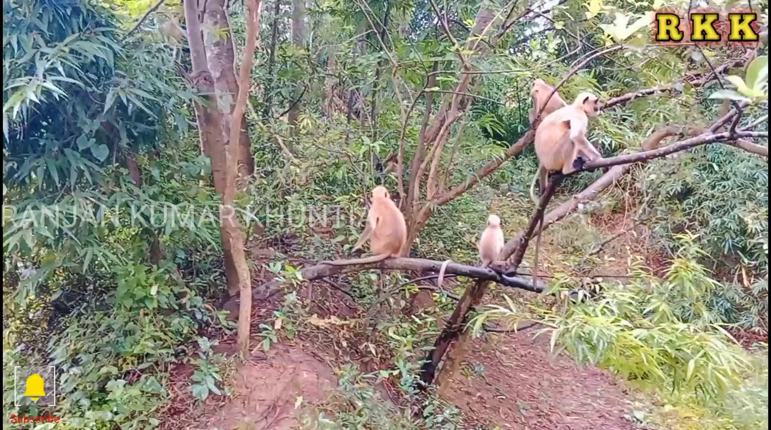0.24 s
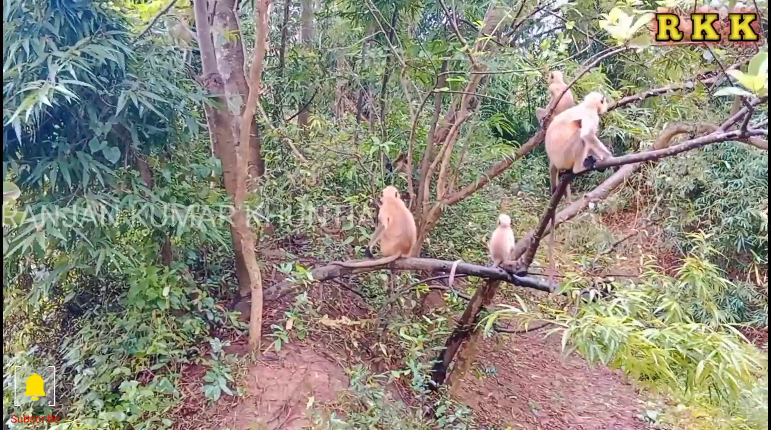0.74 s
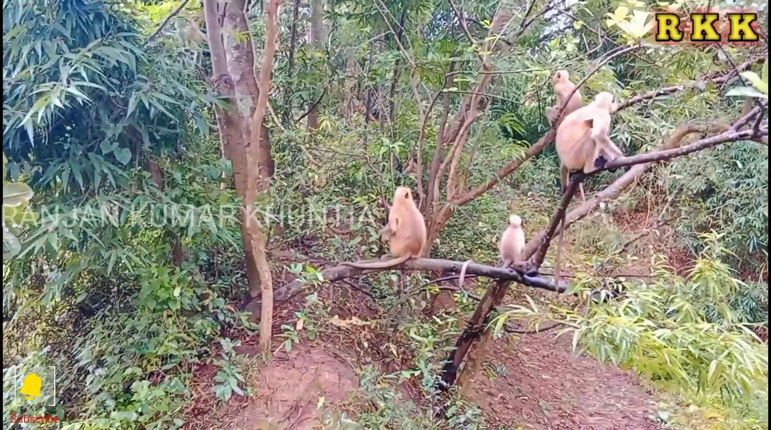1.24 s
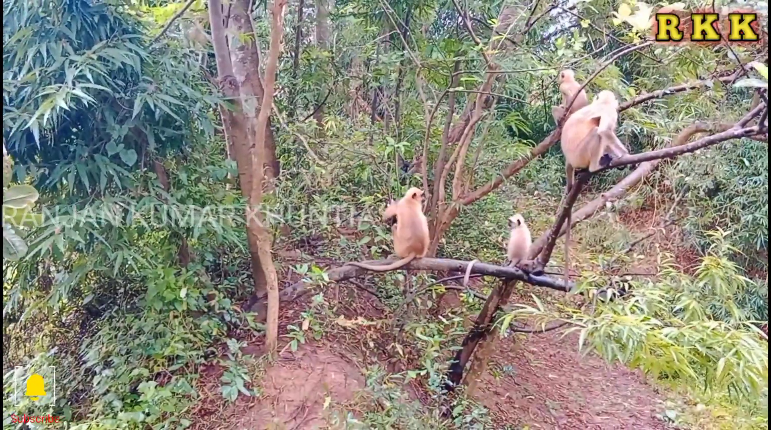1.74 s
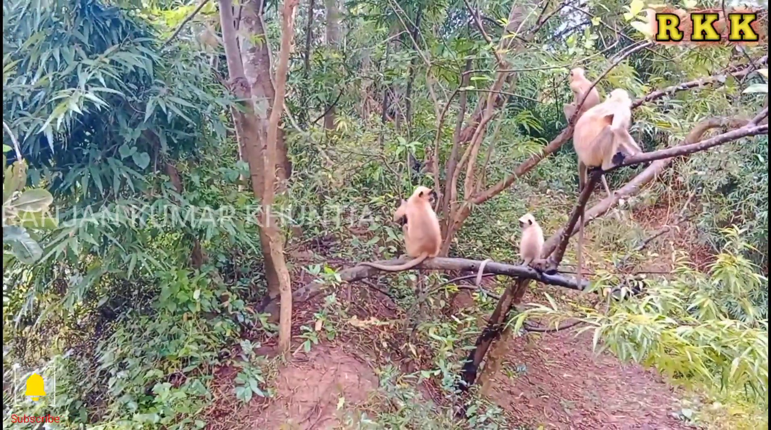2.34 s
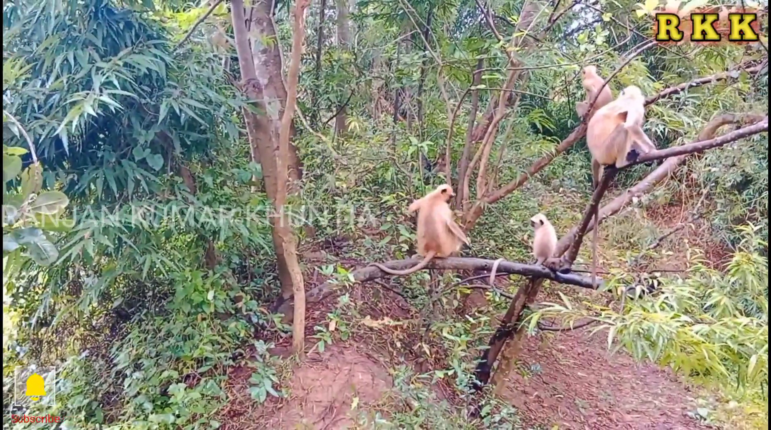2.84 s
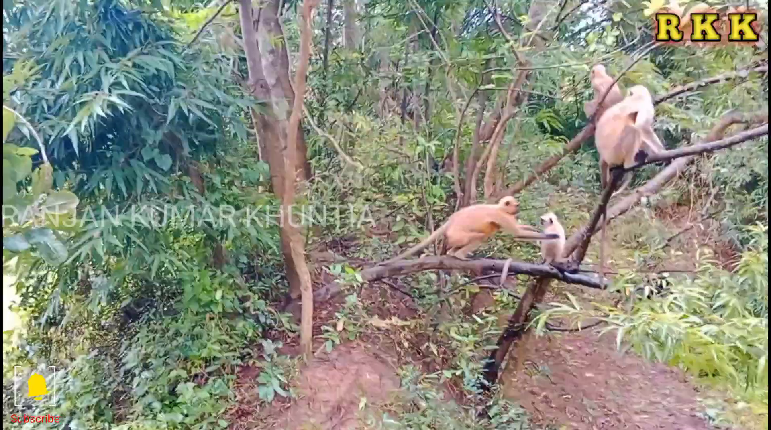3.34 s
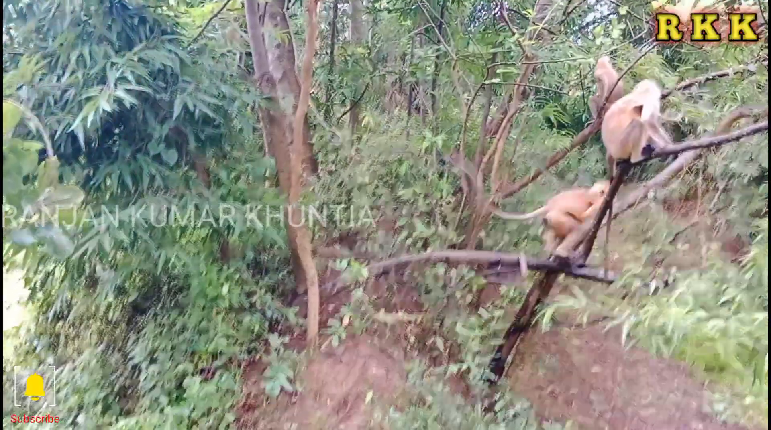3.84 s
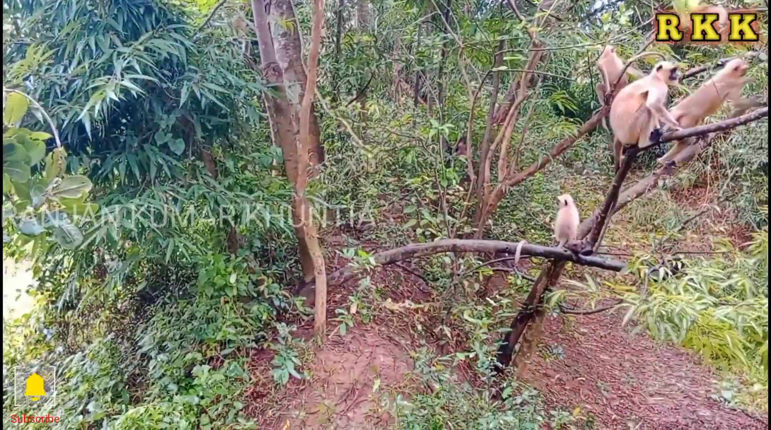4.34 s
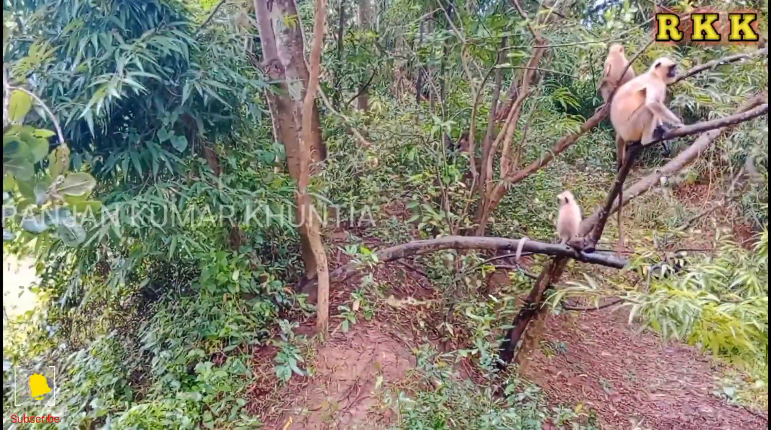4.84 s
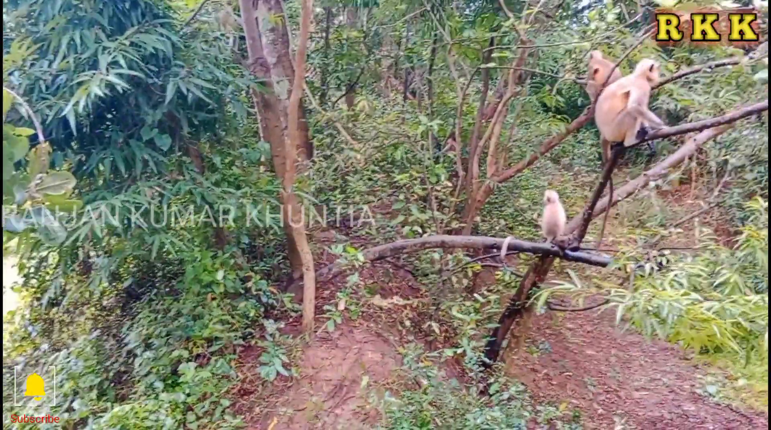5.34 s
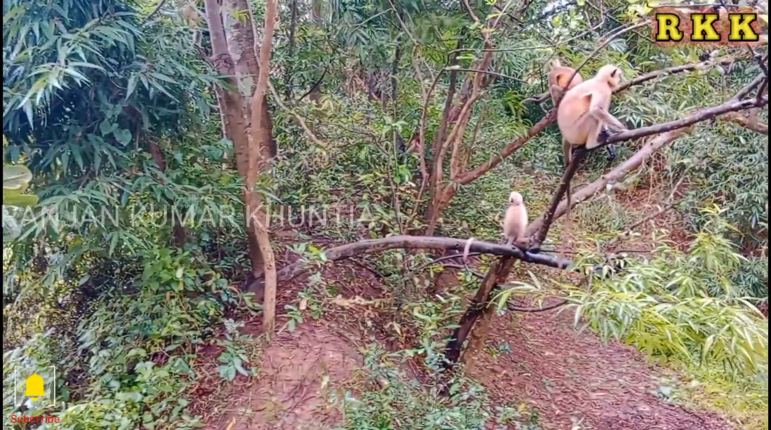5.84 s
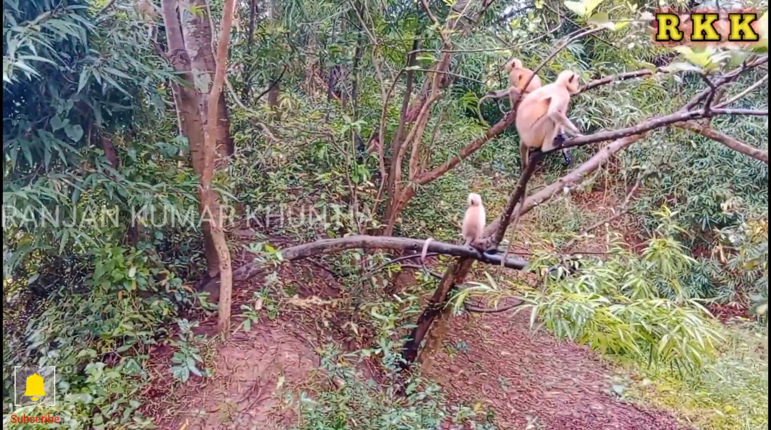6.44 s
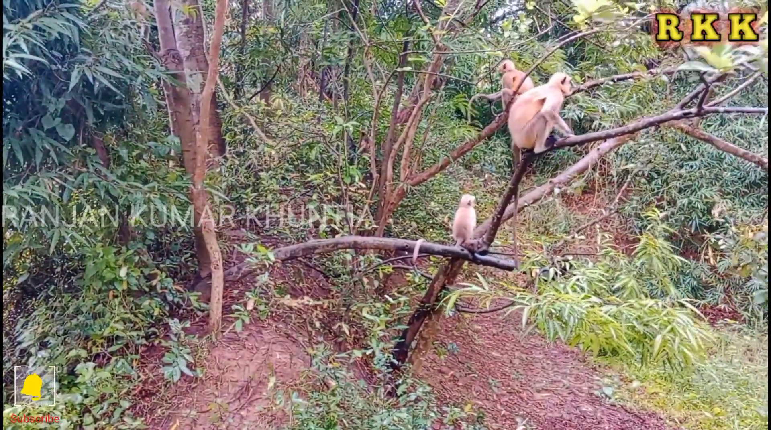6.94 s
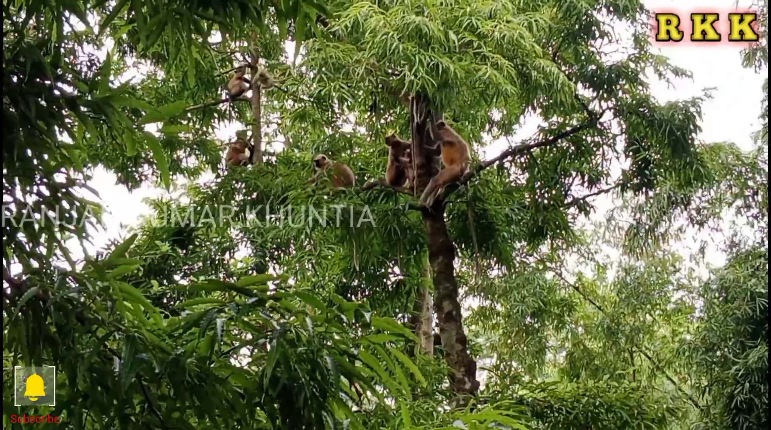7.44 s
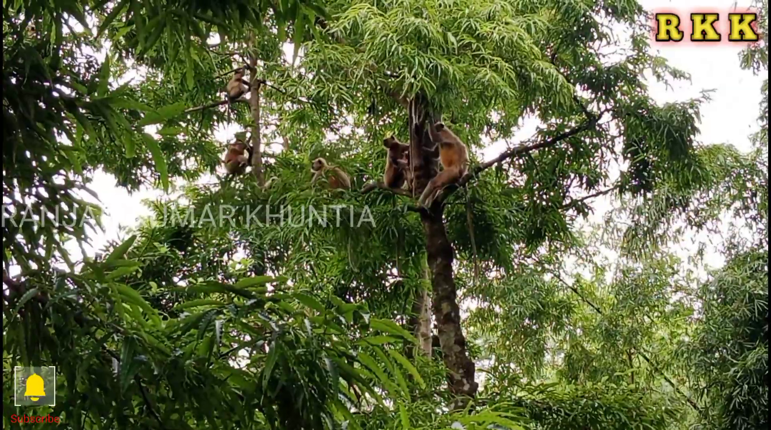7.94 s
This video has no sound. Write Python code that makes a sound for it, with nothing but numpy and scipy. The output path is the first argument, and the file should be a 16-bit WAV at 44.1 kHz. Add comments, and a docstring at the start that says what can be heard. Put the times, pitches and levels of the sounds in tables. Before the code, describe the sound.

Soft birdsong, dull branch thumps and a sharp leafy crash with snapping twigs, before an abrupt cut to a dense, piercing cicada buzz.

```python
"""A forest with monkeys, then a cut at 7 s to a second spot under loud cicadas.
Gliding sine notes, sent into tree echoes, voice the hooted trills, chips, whistles, slurs, pips and coos.
In the first spot a monkey bounds along a branch (pushes over a damped ring) and crashes into foliage
(coloured clicks), snapping twigs. Dense filtered clicks make the far insects and the cicadas, whose
tymbals add narrow ringing bands; soft noise makes the air and the bumps."""
import sys
import numpy as np
from scipy import signal
from scipy.fft import rfft, irfft
from scipy.io import wavfile
from scipy.ndimage import uniform_filter1d

SR = 44100
rng = np.random.default_rng(int(sys.argv[2]) if len(sys.argv) > 2 else 0)


def store_wav(level_fs):
    """Save 16-bit WAV to argv[1]."""
    pcm = np.round(np.clip(np.atleast_2d(level_fs), -1, 1) * 32767)
    wavfile.write(sys.argv[1], SR, pcm.T.astype(np.int16))


N = 360297
T = np.arange(N) / SR
FREQS = np.maximum(np.fft.rfftfreq(N, 1 / SR), 1)
JUMP_S = 7.017  # cut from the first place to the second
WAVER_HZ, WAVER = 21.9, 0.021  # pitch waver: rate, full depth as a share of the pitch


def undb(db):
    """Decibels to gain."""
    return 10 ** (np.asarray(db) / 20)


def unit(x):
    """Scale to rms 1."""
    return x / np.sqrt(np.mean(x ** 2))


def add(out, s, x):
    """Mix x into out from time s."""
    i = max(int(s * SR), 0)
    out[i:i + len(x)] += x[:max(N - i, 0)]


def colour(x, points):
    """Give x a spectral tilt drawn through (f/Hz, level/dB) points, at rms 1."""
    hz, db = np.transpose(points)
    gain = undb(np.interp(np.log(FREQS), np.log(hz), db))
    return unit(irfft(rfft(x) * gain, N))


def butter(x, hz, kind, order=2):
    """Causal low-, high- or band-pass."""
    return signal.sosfilt(signal.butter(order, hz, kind, fs=SR, output="sos"), x)


def walk(rate):
    """Smooth random wander at rms 1, with rate new targets a second."""
    k = int(SR / rate)
    steps = np.repeat(rng.standard_normal(N // k + 1), k)
    return unit(uniform_filter1d(uniform_filter1d(steps, k), k)[:N])


def clicks(rate, spread_db):
    """Random clicks of either sign and unequal size, about rate a second."""
    hits = rng.random(N) < rate / SR
    return hits * rng.choice([-1, 1], N) * undb(spread_db * rng.standard_normal(N))


def swell(s, hold_s, rise_db_s, fall_db_s):
    """Gain that climbs to 1 at time s, holds and dies away."""
    return undb(-rise_db_s * np.maximum(s - T, 0) - fall_db_s * np.maximum(T - s - hold_s, 0))


def whistle(length, start_hz, middle_hz, end_hz, edge=0.22, waver=0):
    """A pure note gliding through three pitches; edge is the share that swells and fades."""
    u = np.linspace(0, 1, int(max(length, .01) * SR))
    hz = np.polyval(np.polyfit([0, .5, 1], [start_hz, middle_hz, end_hz], 2), u)
    hz = hz * (1 + waver * np.sin(2 * np.pi * (WAVER_HZ * T[:len(u)] + rng.random())))
    tone = np.sqrt(2) * np.sin(2 * np.pi * np.cumsum(hz) / SR)
    return tone * signal.windows.tukey(len(u), min(edge, 1))


def flutter(note, hz, depth):
    """Make a note's loudness tremble at about hz."""
    pace, phase = rng.random(2)
    rate_hz = hz * (.8 + .4 * pace)
    return note * (1 + depth * np.sin(2 * np.pi * (rate_hz * T[:len(note)] + phase)))


def forest(x, near_db, near_t60, far_db, far_t60):
    """Near trunks return separate echoes; deeper woods add a thin, long tail."""
    t = T[:SR]
    trunks = clicks(1100, 3)[:SR] * undb(-60 * t / near_t60) * (t > .004)
    depth = rng.standard_normal(SR) * undb(-60 * t / far_t60) * (1 - np.exp(-t / 0.041))
    echoes = undb(near_db) * unit(trunks) + undb(far_db) * unit(depth)
    return x + signal.fftconvolve(x, echoes / np.sqrt(SR))[:N]


def screened(db):
    """Share of a call's direct sound that leaves block: the fainter the call, the more is echo alone."""
    return np.clip((-54 - db) / 20, 0, .8)


# hooted trills: t/s, level/dB, lead-in note level/dB relative to the trill
TRILLS = [(0.119, -56, -33), (1.026, -56.5, -6.5), (1.897, -54.5, -6.5), (2.783, -53, -7),
          (4.775, -44.5, -15), (5.642, -54.5, -4), (6.542, -55, -7.5), (7.32, -52.5, -18)]
HOOT_GAP_S, HOOT_HZ = .0345, (1030, 966, 895)  # spacing; start, middle and end pitch


def hooting_bird():
    """A low lead-in note, four quick falling hoots and a longer last one."""
    out = np.zeros(N)
    for s, db, lead_db in TRILLS:
        add(out, s - .15, undb(db + lead_db) * whistle(.044, 880, 835, 790, edge=.7))
        for k in np.arange(4):
            pitch = 1 + 0.0042 * rng.standard_normal()
            hoot = whistle(.031, *np.array(HOOT_HZ) * pitch, edge=.8)
            add(out, s + HOOT_GAP_S * k - .001, undb(db - .8) * hoot)
        last = whistle(.075, 985, 955, 925, edge=.4)
        add(out, s + .134, last * undb(db + np.linspace(3, -7, len(last))))
    return forest(out, near_db=-8, near_t60=.38, far_db=-19, far_t60=.75)


# bursts of high chips: t/s, number of chips, top pitch f/Hz, level/dB
CHIPS = [(.111, 3, 7350, -57), (0.332, 2, 6260, -66.5), (.498, 2, 7220, -59), (1.071, 3, 7280, -57.5),
         (1.56, 3, 7200, -57.5), (1.89, 3, 6480, -65.5), (1.995, 2, 7240, -55.5), (2.222, 2, 6470, -63.5),
         (2.63, 3, 7300, -56.5), (3.048, 2, 6830, -62), (3.224, 3, 6370, -56), (3.486, 3, 7040, -59.5),
         (4.146, 3, 7100, -56), (4.412, 2, 6160, -60.5), (4.454, 3, 7260, -55.5), (5.13, 3, 7190, -52.5),
         (5.482, 2, 7100, -54), (5.577, 3, 6280, -62), (6.022, 3, 7350, -55.5), (6.341, 3, 6210, -59.5),
         (6.454, 3, 7300, -56.5), (7.335, 3, 5880, -63.5), (8.104, 3, 6670, -52)]
FAR_CHIP_HZ, FAR_CHIP_DB = 6550, -73  # a neighbour's pairs, at random moments in the first place


def chipping_bird(count=12):
    """Each chip drops steeply from its top pitch and flattens out; a weak octave rides on it."""
    out, blocked = np.zeros((2, N))
    slot_s = JUMP_S / count
    neighbour = [((k + when) * slot_s, 2, FAR_CHIP_HZ, FAR_CHIP_DB)
                 for k, when in enumerate(rng.random(count))]
    for s, chips, top_hz, db in CHIPS + neighbour:
        for k in np.arange(round(chips)):
            size_db, bend, stretch = rng.standard_normal(3)
            start, end = top_hz * (1 - 0.006 * k), 5300 * (1 + 0.017 * bend)
            pitches = np.array([start, end + 0.38 * (start - end), end])
            length = 0.016 * (1 + 0.13 * stretch)
            chip = whistle(length, *pitches, edge=0.5)
            chip = chip + undb(-25.0) * whistle(length, *2 * pitches, edge=0.22)
            # the note weakens as it falls
            chip = chip * undb(db + 0.77 * size_db + np.linspace(1, -4.5, len(chip)))
            add(out, s + .0275 * k, chip)
            add(blocked, s + .0275 * k, screened(db) * chip)
    return forest(out, near_db=-1.5, near_t60=.16, far_db=-13, far_t60=.8) - blocked


# feet landing on the branch: t/s, level/dB
LANDINGS = [(0.933, -67), (2.959, -33), (3.104, -58.5), (3.192, -50), (3.227, -32), (3.247, -34.5),
            (3.504, -52), (3.579, -30), (3.682, -66), (3.826, -30), (4.128, -46), (4.25, -57)]
# damped ring of the branch: f/Hz, t60/s, level/dB
BRANCH_MODES = [(74, 0.078, -42), (109.4, 0.069, -17.5), (190, 0.024, -12.5), (298, 0.0092, -7)]
# first touch, full weight and rebound within one landing: delay t/s, level/dB relative to the landing
CONTACTS = [(-.008, -16.5), (0, 0), (.019, -26)]
SOFT_HZ, HARD_HZ, HARD_DB = 264, 980, -29  # cutoff of the softest contact; what one at HARD_DB adds


def thumps():
    """Each contact gives a push and rebound, a short low ring, a scuff and a dying shudder; harder is brighter."""
    out, t = np.zeros(N), T[:SR // 3]
    ring = sum(undb(db) * np.sin(2 * np.pi * hz * t) * undb(-60 * t / t60)
               for hz, t60, db in BRANCH_MODES)
    contacts = [(s + delay, db + part_db) for s, db in LANDINGS for delay, part_db in CONTACTS]
    for s, db in contacts:
        bright_hz = SOFT_HZ + HARD_HZ * undb(db - HARD_DB) ** 0.91
        scuff, shake = rng.standard_normal((2, len(t)))
        push = signal.unit_impulse(len(t)) + undb(-29.5) * scuff * undb(-60 * t / 0.071)
        push = butter(push, bright_hz, "low", order=3)
        push = butter(push, 2040, "low", order=4)
        push = butter(push, 49, "high", order=1)
        shudder = undb(-23.5) * unit(butter(shake, [60, 200], "band")) * undb(-60 * t / 0.15)
        add(out, s - .0005, undb(db) * (push / np.abs(push).max() + ring + shudder))
    return butter(out, 62, "high", order=3)


# spectrum of the slapping leaves: f/Hz, level/dB
LEAF_SPECTRUM = [(290, -49), (500, -11.5), (696, -22.5), (940, -11), (1130, -16), (1270, -2), (2100, -2),
                 (2680, -7.5), (3420, -6), (3790, -14.5), (4760, -24.5), (6920, -7), (8340, -12.5),
                 (9490, -27.5), (15500, -18)]
# spectrum of the settling rustle: f/Hz, level/dB
SETTLING_SPECTRUM = [(290, -38), (500, -30.5), (940, -11.5), (1740, -3), (2010, -2), (2610, -4.5),
                     (3370, -4.5), (4760, -27), (5500, -32), (6260, -5.5), (8460, -1.5), (9490, -12),
                     (15500, -13.5)]
# spectrum of the whooshing boughs: f/Hz, level/dB
BOUGH_SPECTRUM = [(18, -76.5), (30, -32), (199, 5), (328, 2.5), (357, 6), (436, 1.5), (697, 3.5), (862, 2),
                  (900, -2), (1170, -25.5), (1980, -120)]
# snapping twigs: t/s, peak level/dB
SNAPS = [(4.7497, -20.5), (4.7545, -15), (4.7576, -15), (4.7606, -17), (4.7648, -20.5), (4.7672, -18)]


def foliage():
    """Countless leaves slap, then settle to a thinner rustle; boughs whoosh and swing back, a few twigs snap."""
    crash = undb(-35.5) * swell(4.733, hold_s=0.12, rise_db_s=211.5, fall_db_s=128)
    settle = undb(-55.5) * swell(5.104, hold_s=0.032, rise_db_s=49, fall_db_s=28.5)
    plunge = undb(-50) * swell(4.761, hold_s=0.12, rise_db_s=143, fall_db_s=198)
    swing_back = undb(-70) * swell(5.2, hold_s=0.076, rise_db_s=216.5, fall_db_s=171)
    settled = np.clip((T - 4.88) / 0.31, 0, 1)  # crossfade from slaps to rustle
    slapping, dropping = clicks(4000, 3.5), clicks(2500, 4)
    slaps = np.sqrt(1 - settled) * colour(slapping, LEAF_SPECTRUM)
    slaps = slaps + np.sqrt(settled) * colour(dropping, SETTLING_SPECTRUM)
    slaps = butter(slaps, 120, "high") * undb(1.52 + 0.99 * walk(70))
    whoosh = butter(colour(clicks(2000, 2.7), BOUGH_SPECTRUM), 60, "high") * undb(0.5 * walk(50))
    out = np.hypot(crash, settle) * slaps + np.hypot(plunge, swing_back) * whoosh
    t = T[:SR // 50]
    for s, db in SNAPS:
        crack = np.sin(2 * np.pi * 2150 * t) * undb(-60 * t / 0.0041)
        crack = crack + 0.18 * rng.standard_normal(len(t)) * undb(-60 * t / 0.00068)
        crack = butter(crack, 920, "high")
        add(out, s, undb(db) * crack / np.abs(crack).max())
    return out


# spectrum of the cicada buzz: f/Hz, level/dB
CICADA_SPECTRUM = [(5000, -58), (5200, -43.5), (6050, -36.5), (6400, -18.5), (7100, -11.5), (7750, 0),
                   (8350, 1), (8800, -12), (9300, -19), (10000, -23), (11400, -39.5), (12700, -37),
                   (13900, -46), (15300, -34)]
# tymbal resonances: f/Hz, level/dB relative to one another
TYMBALS = [(6799, -70.5), (6928, -86), (7144, -63.5), (7246, -61), (7477, -59.5), (7693, -51), (7747, -50),
           (8070, -51.5), (8317, -50), (8646, -54.5), (8909, -60)]


def cicadas():
    """Overlapping tymbal clicks make a broad buzz; each insect also rings at its own sharp pitch."""
    buzz = colour(clicks(3500, 0.8), CICADA_SPECTRUM)
    rings, width_hz = 0, 11
    for hz, db in TYMBALS:
        resonance = 1 / (1 + ((FREQS - hz) / width_hz) ** 2)
        rings = rings + undb(db) * unit(irfft(rfft(clicks(900, 2.1)) * resonance, N))
    return (undb(-4.0) * buzz + undb(-5.0) * unit(rings)) * undb(-34.5 + .5 * walk(35))


# steep down-slurs: t/s, length/s, level/dB ahead of a 3 dB trim, low after-note level/dB relative to the slur
SLURS = [(7.118, 0.038, -59.5, -6), (7.244, 0.086, -59.5, -27), (7.414, 0.041, -53, -9.5),
         (7.707, 0.046, -52.5, -11), (7.994, 0.037, -52, -10)]
SLUR_HZ, AFTERNOTE_HZ = (4550, 3645, 2567), (2030, 2244, 2430)  # start, middle, end
AFTERNOTE_GAP_S, AFTERNOTE_S = .016, 0.0798


def slurring_bird():
    """A steep slur that grows louder as it drops, then a low rising note; tall trees echo both."""
    out = np.zeros(N)
    for s, length, db, after_db in SLURS:
        slur = flutter(whistle(length, *SLUR_HZ, edge=.2, waver=WAVER), hz=73.1, depth=0.43)
        add(out, s, slur * undb(db + np.linspace(-5, 5, len(slur))))
        after = whistle(AFTERNOTE_S, *AFTERNOTE_HZ, edge=0.52, waver=WAVER)
        after = flutter(after, hz=51.2, depth=0.52)
        add(out, s + length + AFTERNOTE_GAP_S, undb(db + after_db) * after)
    return undb(-3) * forest(out, near_db=4, near_t60=.28, far_db=-3, far_t60=.55)


# short falling pips: t/s, level/dB
PIPS = [(7.634, -64), (7.678, -51.5), (7.886, -51.5), (8.069, -56), (8.119, -51)]


def pipping_bird():
    """A nearer bird repeats one clean falling pip."""
    out = np.zeros(N)
    for s, db in PIPS:
        add(out, s, undb(db) * whistle(0.038, 3180, 3050, 2750, edge=0.41))
    return forest(out, near_db=-8, near_t60=0.15, far_db=-22, far_t60=.55)


# short chirps: t/s, length/s, pitch f/Hz, glide/octaves, level/dB ahead of a 1.5 dB lift
CHIRPS = [(0, 0.069, 2620, .14, -74), (0.099, 0.086, 3010, 0.29, -77.5), (2.041, 0.036, 2866, -0.34, -69),
          (2.741, .21, 3760, .2, -82), (2.758, 0.017, 2698, 0.058, -66.5), (2.875, 0.024, 2795, -.2, -70.5),
          (2.934, 0.025, 2456, 0.175, -64), (3.03, 0.0723, 2704, -0.39, -64.5),
          (3.044, .053, 2220, -.23, -70), (3.077, 0.033, 2730, 0.276, -60), (3.146, 0.042, 3140, 0.3, -60),
          (3.194, 0.066, 2703, -.08, -55.5), (3.23, 0.0305, 2386, .1, -49.5),
          (5.319, 0.029, 3476, 0.32, -58.5), (5.78, .035, 3200, -.16, -70),
          (5.927, 0.03, 2476, -0.083, -67.5), (6.199, 0.049, 3030, -0.17, -66.5),
          (6.223, 0.036, 1635, -.25, -59), (6.267, 0.092, 2514, -.04, -71),
          (6.304, 0.08, 1563, -.25, -57.5), (6.428, 0.035, 2824, 0.77, -60.5),
          (6.504, 0.025, 2703, -0.25, -64), (6.582, 0.11, 2158, -0.34, -69.5)]
# long, nearly level whistles: t/s, length/s, pitch f/Hz, level/dB ahead of the same lift
HELD = [(0.235, .16, 3425, -75.5), (.592, 0.25, 2415, -78.5), (1.48, 0.07, 3210, -85),
        (2.149, .31, 1610, -82), (3.382, 0.17, 3636, -73), (3.783, 0.13, 2470, -78),
        (5.924, 0.21, 3470, -73.5), (6.822, 0.091, 2936, -70.5)]
CHIRP_BEND, HELD_SAG = 0.026, .05  # octaves: bend of a chirp's middle; fall of a whistle, start to end
# warble of arched notes: start, spacing and note length, then top pitch, its climb per note, arch share
WARBLE_S, WARBLE_GAP_S, WARBLE_NOTE_S = .824, 0.096, 0.06
WARBLE_HZ, WARBLE_STEP_HZ, WARBLE_ARCH = 3020, 108.8, .18


def songbirds(count=3):
    """Chirps, held whistles and a climbing warble of count notes, all fluttering and half hidden by leaves."""
    notes = []
    for s, length, hz, glide, db in CHIRPS:
        octaves = np.array([-glide / 2, CHIRP_BEND * np.sign(glide), glide / 2])
        notes.append((s, db, whistle(length, *hz * 2 ** octaves, waver=WAVER / 2)))
    sag = 2 ** (HELD_SAG / 2)
    for s, length, hz, db in HELD:
        notes.append((s, db, whistle(length, hz * sag, hz, hz / sag, waver=WAVER / 2)))
    for k in range(count):
        top = WARBLE_HZ + k * WARBLE_STEP_HZ
        foot = top * (1 - WARBLE_ARCH)
        db = -63.5 - 8.5 * abs(k - 1)  # the second note is loudest
        notes.append((WARBLE_S + k * WARBLE_GAP_S, db, whistle(WARBLE_NOTE_S, foot, top, foot, waver=WAVER)))
    out, blocked = np.zeros((2, N))
    for s, db, note in notes:
        note = undb(db) * flutter(note, hz=49.7, depth=0.59)
        add(out, s, note)
        add(blocked, s, screened(db) * note)
    return undb(1.5) * (forest(out, near_db=-2, near_t60=.27, far_db=-10, far_t60=.65) - blocked)


# low throbbing coos: t/s, length/s, pitch f/Hz, level/dB
COOS = [(.629, 0.097, 931, -75.5), (0.747, .07, 911, -67), (7.017, 0.12, 678, -63), (7.15, .16, 692.7, -61),
        (7.155, 0.061, 866, -72), (7.634, 0.14, 591, -69), (7.775, 0.15, 708, -64.5),
        (7.901, 0.11, 645.4, -66.5), (7.915, 0.044, 860, -73), (7.996, .13, 691, -60.5)]


def cooing_bird():
    """Low, slightly arched notes that throb."""
    out = np.zeros(N)
    for s, length, hz, db in COOS:
        foot = hz * (1 - 0.046)
        coo = whistle(length, foot, hz, foot, edge=0.14)
        add(out, s, undb(db) * flutter(coo, hz=47.2, depth=.5))
    return forest(out, near_db=-7.5, near_t60=0.28, far_db=-7.5, far_t60=0.37)


# soft bumps and brushes: t/s, length/s, level/dB, low edge f/Hz, high edge f/Hz
BUMPS = [(0.888, 0.079, -78.5, 91, 393), (1.827, 0.051, -83, 35, 88), (2.948, .04, -53, 50, 107),
         (3.602, .15, -75.5, 68.4, 126), (6.88, 0.045, -71, 60, 145)]


def bumps():
    """Brief low noise swells with no sharp contact."""
    out = np.zeros(N)
    for s, length, db, low_hz, high_hz in BUMPS:
        size = int(length * SR)
        noise = butter(rng.standard_normal(SR), [low_hz, high_hz], "band")[-size:]
        add(out, s, undb(db) * unit(noise * np.hanning(size)))
    return butter(out, 42, "high", order=4)


def far_birds(count=150):
    """A faint chorus of random slurs, heard mostly by its echoes."""
    out = np.zeros(N)
    for when, pitch, slope, size in rng.random((count, 4)):
        hz, glide = 1400 + 1750 * pitch, 1 + 0.35 * (slope - .5)
        slur = whistle(0.1, hz / glide, hz, hz * glide, edge=0.97)
        add(out, when * N / SR, undb(-97 + 4 * size) * slur)
    return forest(out, near_db=8, near_t60=.25, far_db=-1, far_t60=.6)


# spectrum of the distant insects: f/Hz, level/dB
FAR_SPECTRUM = [(5000, -56), (5500, -17.5), (6600, -8.5), (7200, -15.5), (7700, 6), (8300, 8.5), (8800, 3),
                (9300, -16.5), (10200, -5), (11300, -25), (12700, -17), (14000, -32), (15300, -15)]
# lulls in the far insects: t/s, length/s, depth level/dB
LULLS = [(2.063, 0.18, -4.5), (2.991, 0.19, -15), (3.51, 0.63, -12.5)]
LULL_ONSET_S, LULL_RECOVERY = 0.071, 0.43  # recovery time as a share of the lull's length


def far_insects():
    """Many distant insects merge into a high sizzle over an even hiss; it drops into lulls and recovers."""
    lull_db = 0
    for s, length, db in LULLS:
        corners = [s - LULL_ONSET_S, s, s + length, s + length * (1 + LULL_RECOVERY)]
        lull_db = lull_db + np.interp(T, corners, [0, db, db, 0])
    hiss = undb(-88) * unit(butter(rng.standard_normal(N), [10500, 15500], "band"))
    sizzle = colour(clicks(9800, 5.2), FAR_SPECTRUM)
    # leaves and trunks comb the sound into fine uneven lines
    sizzle = unit(forest(sizzle, near_db=-7.0, near_t60=0.046, far_db=-23.0, far_t60=0.54))
    return sizzle * undb(-71.5 + lull_db + 0.98 * walk(25)) + hiss


# air spectrum in the first place: f/Hz, level/dB
AIR_FIRST = [(18, -29), (30, -7), (49, -7.5), (129, -4.5), (588, -10.5), (846, -4.5), (1120, -9),
             (1950, -5.5), (2930, -14.5), (4690, -24.5), (5000, -2.5), (6500, -67), (11000, -120)]
# air spectrum in the second place: f/Hz, level/dB
AIR_SECOND = [(18, -49), (30, -24), (48, -5), (475, -12), (846, -8), (1870, -8), (2260, 0), (2580, -8.5),
              (3120, -5), (3790, -14), (5000, -48), (6500, -70), (11000, -120)]


def air(spectrum, db):
    """Faint stir of leaves and distance: coloured noise, swelling slowly."""
    return colour(rng.standard_normal(N), spectrum) * undb(db + 1.0 * walk(3.38))


def scene():
    """Two places in the same forest, one after the other; the shared birds carry across the cut."""
    first = far_insects() + air(AIR_FIRST, -86.0) + thumps() + bumps() + foliage()
    second = cicadas() + air(AIR_SECOND, -74.0) + slurring_bird() + pipping_bird()
    birds = hooting_bird() + chipping_bird() + songbirds() + cooing_bird() + far_birds()
    return (np.where(T < JUMP_S, first, second) + birds)[None]


def record(dry):
    """The microphone has a narrow dip under 5 kHz; the top is cut steeply."""
    dip_db = -16 * np.exp(-((FREQS - 4880) / 190) ** 2)
    coloured = irfft(rfft(dry) * undb(dip_db), N)
    return signal.sosfilt(signal.ellip(10, .2, 70, 15550, fs=SR, output="sos"), coloured)


dry = scene()
out = record(dry)
store_wav(out)
```